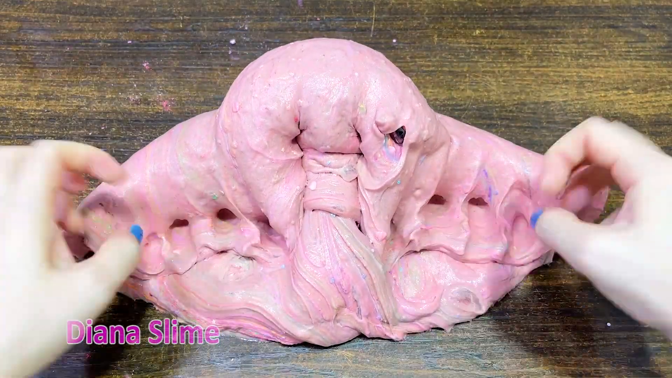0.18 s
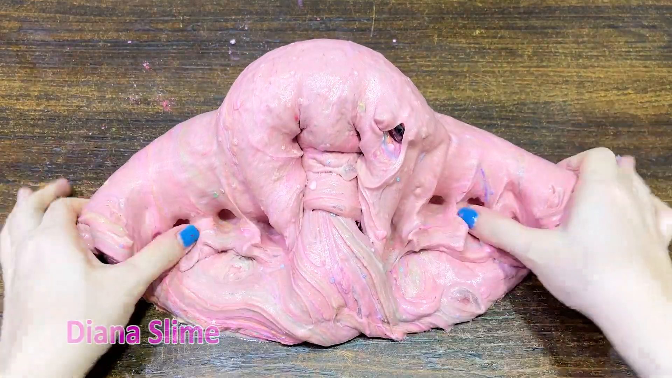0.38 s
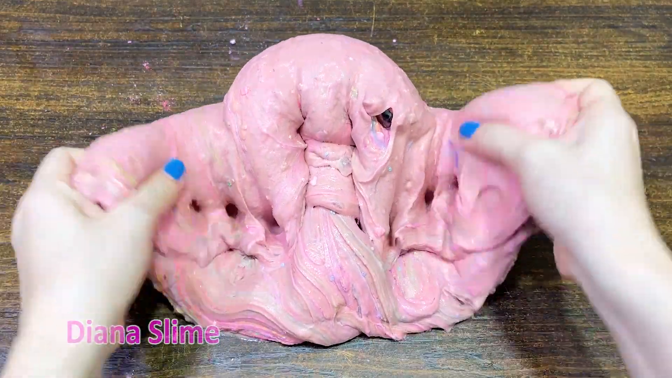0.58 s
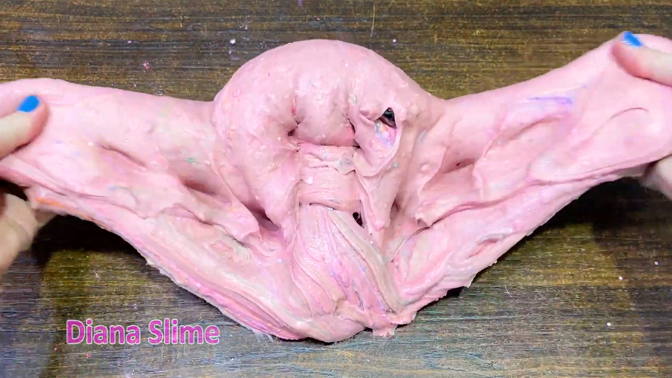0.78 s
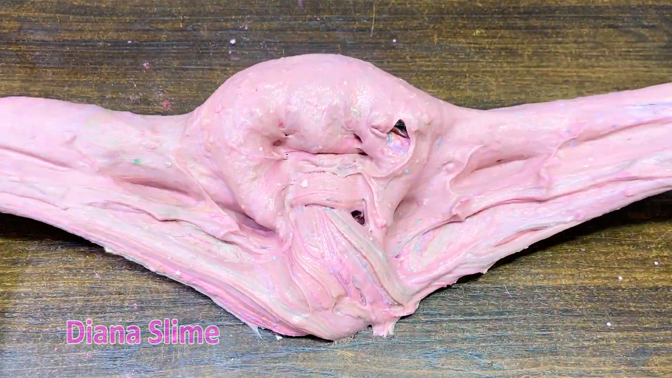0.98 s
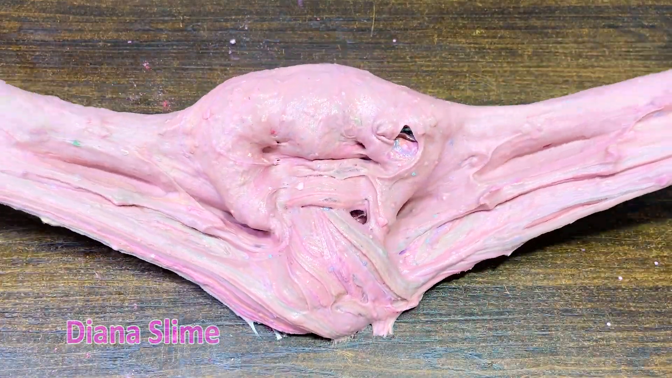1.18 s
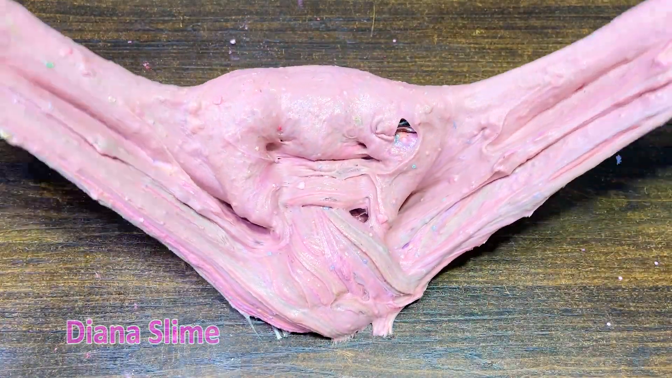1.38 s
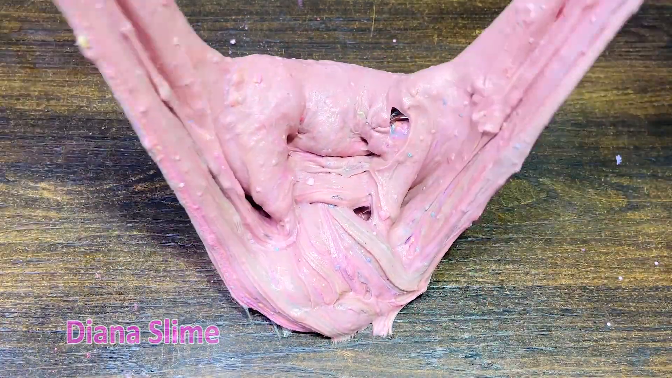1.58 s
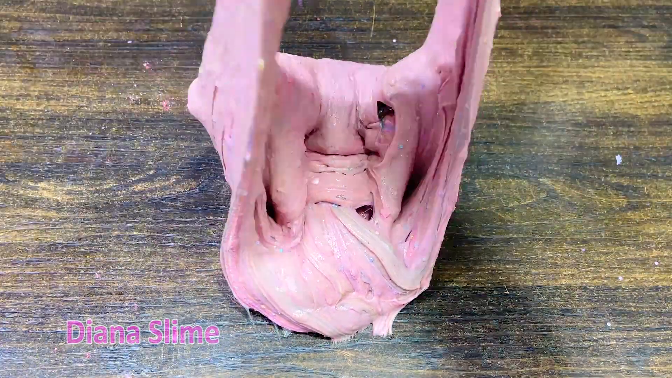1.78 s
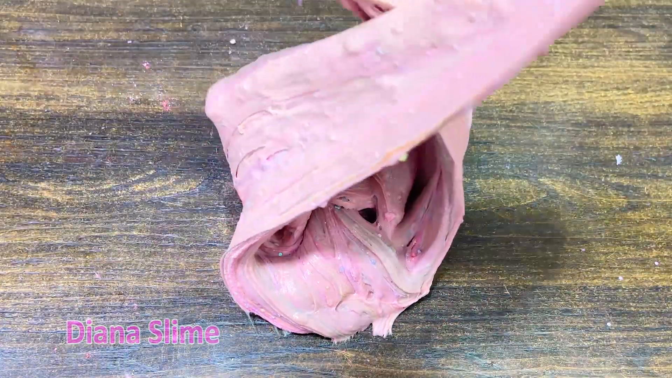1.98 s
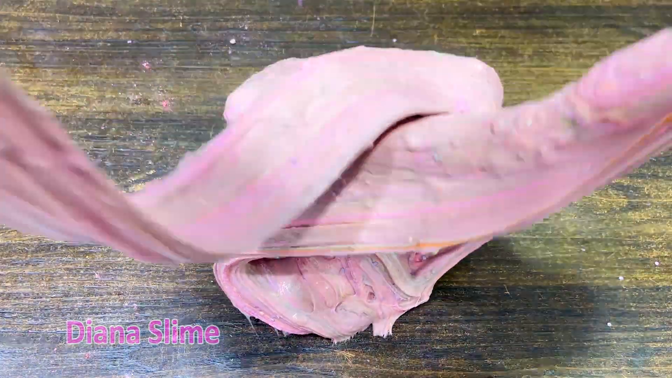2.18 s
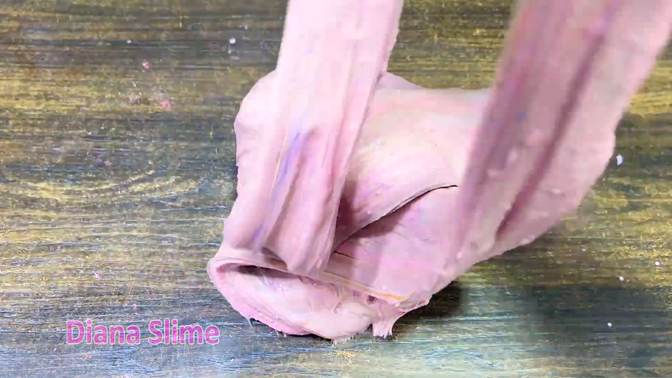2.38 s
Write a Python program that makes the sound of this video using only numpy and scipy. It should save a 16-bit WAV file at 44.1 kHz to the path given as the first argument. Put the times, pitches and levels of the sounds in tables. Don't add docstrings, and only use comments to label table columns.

```python
import sys
import numpy as np
from scipy import signal
from scipy.fft import rfft, irfft
from scipy.io import wavfile

SR = 44100
rng = np.random.default_rng(int(sys.argv[2]) if len(sys.argv) > 2 else 0)


def transcribe(u):
    v = np.clip(np.atleast_2d(u).T, -1, 1)
    q = np.round(v * 32767).astype(np.int16)
    wavfile.write(sys.argv[1], SR, q)


def gain_from_db(level_db):
    decades = np.asarray(level_db, float) / 20
    return 10 ** decades


N = 105840


def rms_one(x):
    return x / np.sqrt(np.mean(x ** 2) + 1e-20)


def at_hz(points, hz):
    point_hz, point_db = np.transpose(points)
    return np.interp(np.log(hz), np.log(point_hz), point_db)


def band_pass(x, order, edges_hz):
    return signal.sosfilt(signal.butter(order, edges_hz, "band", fs=SR, output="sos"), x)


def drift(rate_hz):
    r = np.exp(-2 * np.pi * rate_hz * 10 / SR)
    slow = signal.lfilter([1], [1, -2 * r, r * r], rng.standard_normal(N // 10 + 4002))
    slow = rms_one(slow[4000:])
    return np.interp(np.arange(N) / 10, np.arange(len(slow)), slow)


def ring(clicks, hz, t60):
    r = gain_from_db(-60 / (t60 * SR))
    w = 2 * np.pi * min(hz, SR / 2.2) / SR
    return signal.lfilter([np.sin(w)], [1, -2 * r * np.cos(w), r * r], clicks + 1e-18)


def place(x, lag, pan_db):
    turn = np.exp(-1j * np.pi * lag * np.arange(len(x) // 2 + 1) / len(x))
    both = irfft(rfft(x) * np.array([1 / turn, turn]), len(x))
    return both * gain_from_db(np.array([[pan_db / 2], [-pan_db / 2]]))


def banded(spectrum, low_hz, count, patchy_db):
    # (frequency [Hz], correlation [0-1])
    likeness = [(60, 0.55), (290, 0.85), (700, 0.4), (2000, 0.3), (9000, .3), (12000, 1)]
    edges = low_hz * 2 ** (np.arange(count + 1) / 3)
    white = rng.standard_normal((2, 2, N))
    out = 0
    for k, (low, high) in enumerate(zip(edges, edges[1:])):
        mid, side = band_pass(white[k % 2], 2, [low, high])
        hz = np.sqrt(low * high)
        alike = np.clip(at_hz(likeness, hz), -1, 1)
        stereo = np.sqrt(1 + alike) * mid + np.sqrt(1 - alike) * side * [[1], [-1]]
        out = out + gain_from_db(at_hz(spectrum, hz) + patchy_db * drift(15.0)) * stereo
    return rms_one(out)


def room_tone():
    # (frequency [Hz], level [dB per Hz])
    murmur = [(35, -28), (65, -6.5), (160, -14), (300, -12.5), (480, -14.5), (690, -4.5), (1000, -27.5),
              (2000, -27.5)]
    # (frequency [Hz], level [dB per Hz])
    air = [(2000, -1), (5500, -2), (10000, -0.5), (13000, -4.5), (15500, -4)]
    low_part = gain_from_db(-61.5) * banded(murmur, 30.37, count=18, patchy_db=-3.0)
    return low_part + gain_from_db(-74) * banded(air, 2000, count=9, patchy_db=-0.5)


def chirr():
    center_hz, width_hz, level_db, pan_db = 8000, 1000, -72, 16
    edges_hz = [center_hz - width_hz / 2, center_hz + width_hz / 2]
    hiss = band_pass(rng.standard_normal((2, N)), 1, edges_hz)
    hiss = rms_one(band_pass(hiss, 1, edges_hz))
    return hiss * gain_from_db(level_db + np.array([[pan_db / 2], [-pan_db / 2]]))


def fizz():
    # (time [s], level [dB], low body [dB])
    press = [
        (0, -62, -29),
        (0.045, -62.5, -35),
        (0.099, -83, -17),
    ]
    # (time [s], level [dB], low body [dB])
    pull_out = [
        (.155, -76, -9),
        (.19, -38, -13),
        (.217, -29, -13),
        (.238, -36, -4),
        (.263, -15.5, -6),
        (.273, -27, 0),
        (.293, -29.5, -1),
        (.31, -45, -6),
        (.42, -78, -12),
    ]
    # (time [s], level [dB], low body [dB])
    stretch = [(0.446, -59, -21), (0.452, -54, 3.5), (0.483, -65.5, 0), (0.501, -53, 2), (0.539, -43.5, -6),
               (0.58, -40, -6), (0.658, -40.5, -4.5), (0.77, -30, -14), (0.888, -51, -14),
               (1.06, -48.5, -12.5), (1.1, -49.5, -11.5), (1.18, -50.5, -14), (1.37, -51.5, -12.5),
               (1.43, -56, -10), (1.601, -48.5, -41), (1.691, -55.5, -30), (1.758, -42.5, -36.5),
               (1.86, -69.5, -18)]
    # (frequency [Hz], level [dB])
    colour = [(800, -20.5), (1250, -16.5), (1900, 7), (3300, 5), (6500, 2.5), (9000, -6.5), (12000, 7.5),
              (15000, 4)]
    # (right lags by [samples], left over right [dB])
    spots = [(.2, -4), (.4, 3), (.5, -3), (.6, 5), (.3, -1)]
    table_hz = [50, 170]
    pockets_per_s, pocket_cycles, size_spread_db, clump_db = 26000, 10., 3.1, 1.1
    dull_pivot_hz, patch_db, tilt = 3500, 2.5, .7
    table_db, table_follows = -38, .6

    s, level_db, dull_db = np.transpose(press + pull_out + stretch)
    t = np.arange(N) / SR
    level_db = np.interp(t, s, level_db, right=-110)
    dull_db = np.interp(t, s, dull_db)
    pitches = np.geomspace(800, 15700, 24)
    pitch_odds = pitches ** .6 / np.sum(pitches ** .6)
    clump = gain_from_db(clump_db * (drift(36) + drift(220)))
    dull, bright = 0, 0
    for lag, pan_db in spots:
        sizes = gain_from_db(size_spread_db * np.minimum(rng.exponential(1, N), 5)) * rng.choice([-1, 1], N)
        bursts = (rng.random(N) < pockets_per_s / len(spots) * clump / SR) * sizes
        dealt = rng.choice(len(pitches), N, p=pitch_odds)
        patches = [drift(8), drift(15), drift(25)]
        low_rings, high_rings = np.zeros(N), np.zeros(N)
        for k, hz in enumerate(pitches):
            gain = gain_from_db(at_hz(colour, hz) + patch_db * patches[k % len(patches)]) * hz ** tilt
            ringing = gain * ring(bursts * (dealt == k), hz, pocket_cycles / hz)
            if hz < dull_pivot_hz:
                low_rings += ringing
            else:
                high_rings += ringing
        dull = dull + place(low_rings, lag, pan_db)
        bright = bright + place(high_rings, lag, pan_db)
    rumble = rms_one(band_pass(rng.standard_normal(N), 2, table_hz))
    table = gain_from_db(table_db + table_follows * level_db + 2 * drift(13)) * rumble
    out = gain_from_db(level_db) * (gain_from_db(dull_db) * rms_one(dull) + rms_one(bright))
    steep = signal.cheby2(16, 40, [350, 16150], "band", fs=SR, output="sos")
    return signal.sosfilt(steep, out) + table


def snaps():
    # (time [s], peak [dB], low edge [Hz], high edge [Hz])
    pocket_snaps = [(0.033, -30, 11000, 15500), (0.2541, -12, 5800, 12000), (0.2585, -10, 4700, 14300),
                    (0.2622, -6, 4500, 14900), (0.2641, -8, 2000, 5700), (0.4485, -35, 1100, 4500),
                    (0.4902, -35, 4200, 7200), (0.4973, -34, 1900, 3200), (0.5, -34, 3700, 11900),
                    (0.5048, -22, 2200, 12100), (0.5318, -31, 4500, 9200), (0.5638, -29, 6500, 14400),
                    (0.5906, -24, 3800, 14800), (0.684, -21, 1300, 14600), (0.6886, -25, 6900, 14000),
                    (0.746, -14, 13000, 15500), (0.7553, -4, 5200, 14500), (0.7937, -17, 10700, 15100),
                    (0.9221, -30, 9500, 13000), (0.9599, -37, 4400, 6500), (1.066, -38, 1500, 6500),
                    (1.0851, -16, 7000, 10900), (1.096, -39, 2700, 3600), (1.1055, -30, 5000, 9900),
                    (1.2041, -34, 4700, 9500), (1.2425, -33, 11800, 15000), (1.4969, -39, 6500, 8200),
                    (1.5159, -30, 11700, 15100), (2.2212, -49, 7500, 13900), (2.3749, -40, 4400, 15000),
                    (.1883, -32, 13000, 15500), (.1973, -28, 12500, 15500), (.2155, -24, 6000, 10000),
             (.2478, -19, 5000, 9000), (.2675, -12, 6000, 14000), (.2725, -15, 2500, 4500),
             (.2895, -21, 1500, 4500), (.5048, -38, 800, 1200), (.5512, -36, 1700, 2300),
             (.5635, -34, 1300, 1900), (.571, -33, 1600, 2200), (.583, -33, 1700, 3200),
             (.5906, -28, 1300, 2000), (.6166, -33, 2300, 3600), (.656, -33, 900, 1700),
             (.664, -33, 1600, 2600), (.7, -25, 1200, 4300), (.7005, -27, 6500, 11500),
             (.7135, -31, 1400, 2300), (.728, -30, 2400, 3200), (.7465, -30, 800, 1700),
             (.7558, -24, 3600, 5000), (.7568, -17, 11000, 15500), (.84, -31, 10000, 15500),
             (.9088, -45, 3400, 4100), (.922, -45, 1100, 2000), (.9605, -42, 1100, 3300),
             (1.0425, -43, 2400, 3000), (1.0855, -41, 1300, 3500), (1.128, -45, 800, 1200),
             (1.1767, -40, 3000, 5500), (1.2401, -46, 1800, 3800), (1.275, -42, 2200, 6000),
             (1.292, -45, 800, 1200), (1.302, -44, 3300, 7000), (1.378, -40, 4000, 12000),
             (1.4366, -48, 4000, 5200), (1.4705, -42, 1300, 4000), (1.5344, -47, 3600, 7000),
             (1.709, -48, 1000, 1900), (1.741, -44, 1500, 5000), (2.008, -62, 1100, 1900),
             (2.222, -60, 1000, 1900), (2.377, -57, 1100, 3000)]
    decay_s, edge, lag, pan_db, trim_db, db_per_oct = .0007, 3.5, .5, 0, 1, 2.2
    pops = pocket_snaps
    out, t = np.zeros((2, N + 512)), np.arange(512) / SR
    for (s, db, low, high), noise in zip(pops, rng.standard_normal((len(pops), 512))):
        spit = noise * np.exp(-t / decay_s) + edge * (t == 0)
        pop = band_pass(np.roll(spit, 16), 3, [low * .9, high * 1.05])
        start = int(s * SR) - abs(pop).argmax()
        gain = gain_from_db(db + trim_db + db_per_oct * np.log2(high / 4000))
        pop = gain * pop / abs(pop).max()
        out[:, start:start + 512] += place(pop, lag, pan_db + 1.5 * noise[-1])
    return out[:, :N]


def gulps():
    # (time [s], peak [dB], pitch [Hz], rise [s], ring t60 [s])
    hollows = [(0.225, -22, 315, 0.0089, 0.065), (0.254, -20.5, 328.5, 0.0083, 0.024),
               (0.265, -15, 345.7, 0.0041, 0.021), (0.275, -29.5, 438, 0.0051, 0.15),
               (0.284, -32.5, 265, 0.0043, 0.25), (0.281, -40, 66.86, 0.048, 0.28),
               (0.299, -39.5, 600, 0.0059, 0.089), (0.45, -41.5, 265.7, 0.0041, 0.045),
               (.45, -54, 120, 0.0067, 0.059), (.66, -61, 80, 0.018, 0.27), (1.95, -54.5, 633, 0.021, 0.38),
               (1.948, -67, 252, 0.034, 0.13), (1.97, -63, 62.1, 0.04, 0.2),
               (2.031, -60, 676.4, 0.023, 0.28), (1.95, -56, 387.4, 0.0081, .15),
               (2.1, -60, 145, 0.023, .6), (2.191, -47, 137, 0.077, 0.19), (2.218, -59, 65, 0.066, 0.33),
               (2.29, -51.5, 648, 0.0067, 0.025)]
    out, t = np.zeros(N), np.arange(N) / SR
    for s, db, hz, rise, t60 in hollows:
        u = np.maximum(t - s, 0)
        swell = np.sin(np.pi / 2 * np.minimum(u / rise, 1)) ** 2
        decay = gain_from_db(-60 * np.maximum(u - rise, 0) / t60)
        level = gain_from_db(db + min(30 * t60, 3.) * drift(hz / 8))
        cycles = hz * np.cumsum(1 + hz / 8000 * drift(hz / 8)) / SR
        out += level * swell * decay * np.sin(2 * np.pi * cycles)
    return out


def walls(x):
    t60_s, level_db, part_hz = 0.2, -9.5, 1500
    t = np.arange(SR // 2) / SR
    shared = rng.standard_normal(len(t))
    high_pass = signal.butter(1, part_hz, "high", fs=SR)
    apart = signal.lfilter(*high_pass, rng.standard_normal((2, len(t))))
    tail = (shared + 3.5 * apart) * gain_from_db(-60 * t / t60_s) * (t > .003)
    tail = signal.lfilter([1], [1, -.1], tail)
    tail = tail / np.sqrt(np.sum(tail ** 2) / 2)
    return gain_from_db(level_db) * signal.fftconvolve(x, tail, axes=1)[:, :N]


def scene():
    mass = fizz() + snaps() + gulps()
    return mass + walls(mass) + room_tone() + chirr()


def top_cut(x):
    return signal.sosfilt(signal.butter(12, 16960, fs=SR, output="sos"), x)


def record(dry):
    turn_hz, turn_width_hz, null_hz, null_width_hz = 13300, 1000, 13400, 900
    shade_hz, shade_share = 5500, .35
    r, c = np.exp(-np.pi * turn_width_hz / SR), np.cos(2 * np.pi * turn_hz / SR)
    left = signal.lfilter([r * r, -2 * r * c, 1], [1, -2 * r * c, r * r], dry[0])
    right = dry[1] - shade_share * signal.lfilter(*signal.iirpeak(shade_hz, 1, SR), dry[1])
    both = np.array([left, right])
    mid = both.mean(axis=0)
    both = both - signal.lfilter(*signal.iirpeak(null_hz, null_hz / null_width_hz, SR), mid)
    both = signal.sosfilt(signal.butter(3, 50, "high", fs=SR, output="sos"), both)
    mix = 1.23 * np.tanh(both / 1.424)
    return top_cut(mix)


dry = scene()
out = record(dry)
transcribe(out)
```